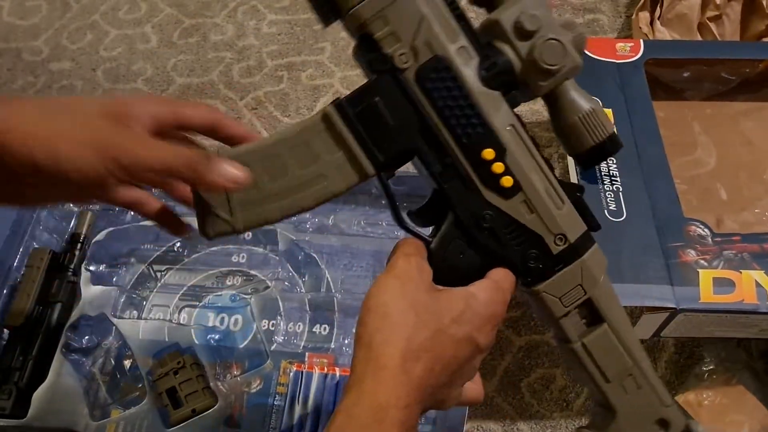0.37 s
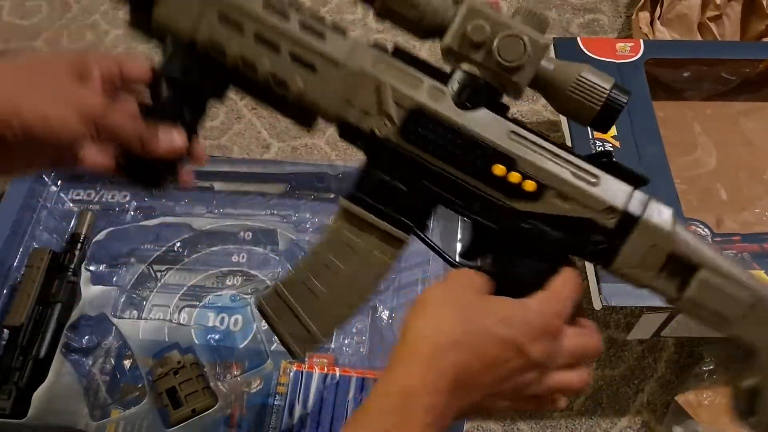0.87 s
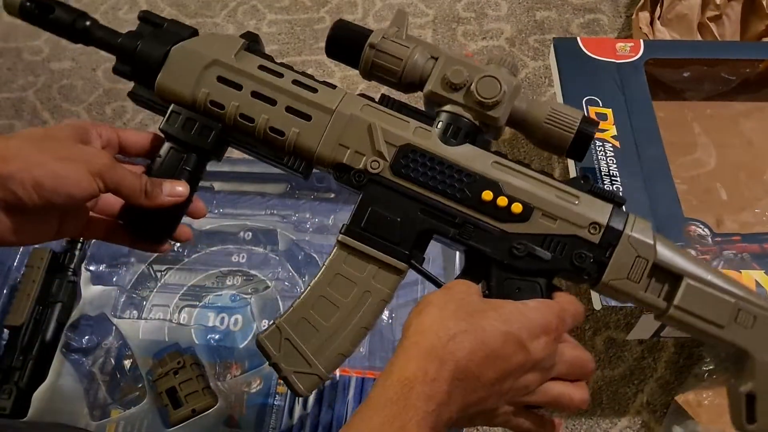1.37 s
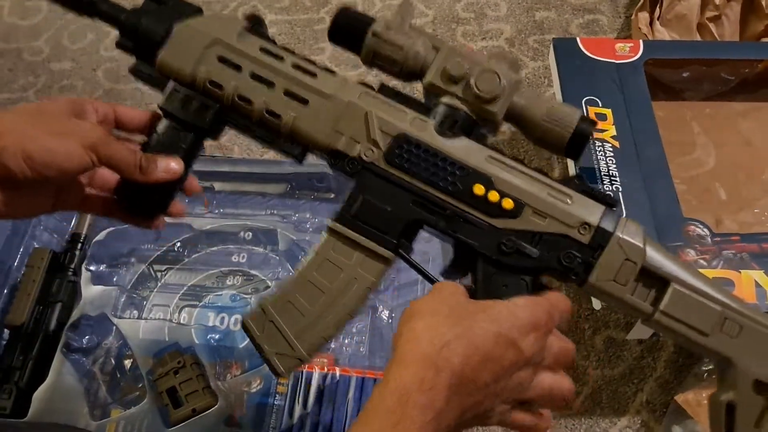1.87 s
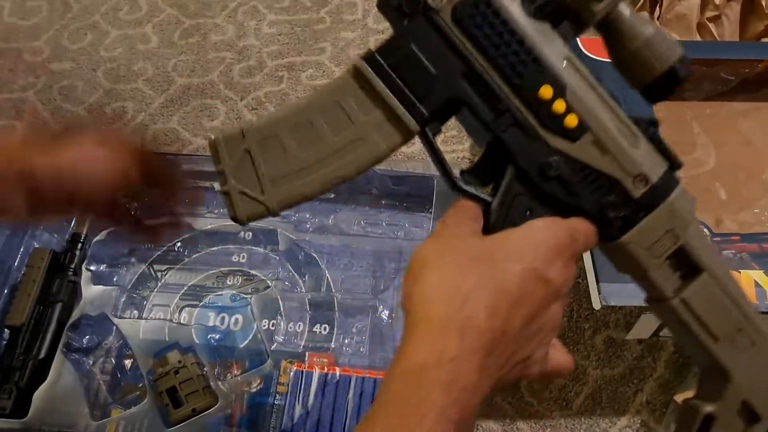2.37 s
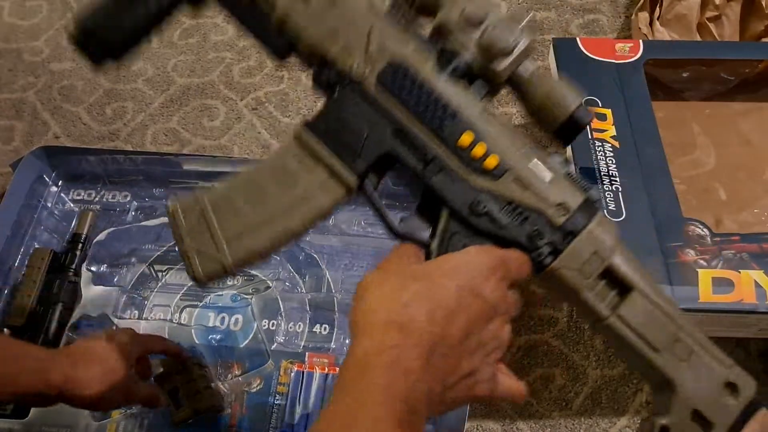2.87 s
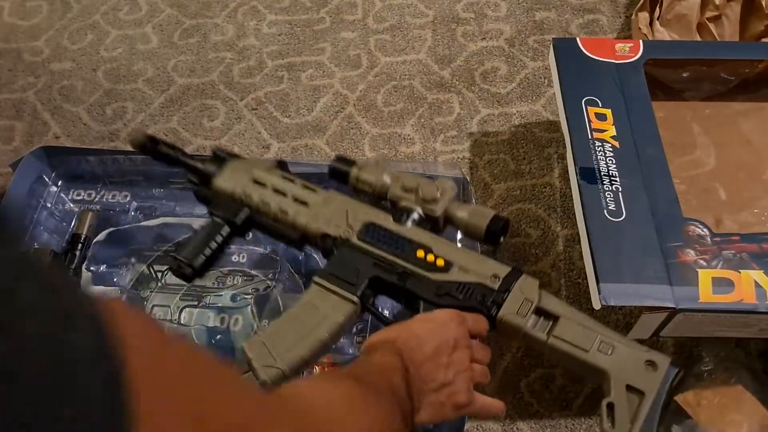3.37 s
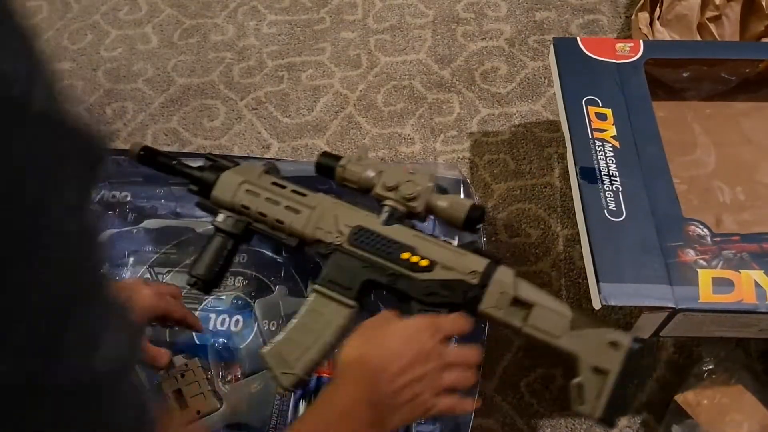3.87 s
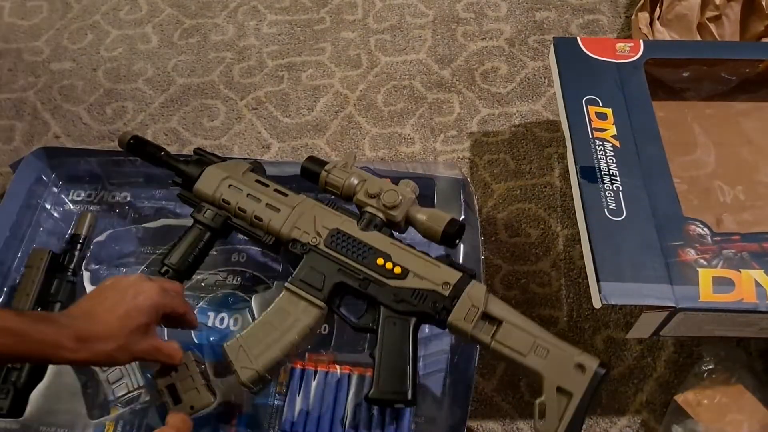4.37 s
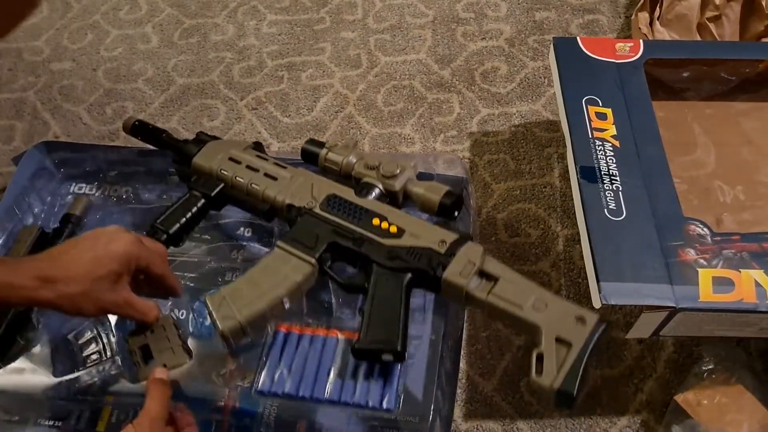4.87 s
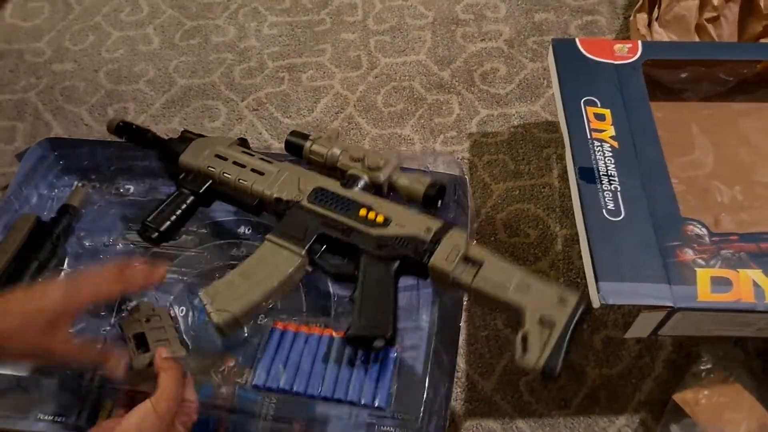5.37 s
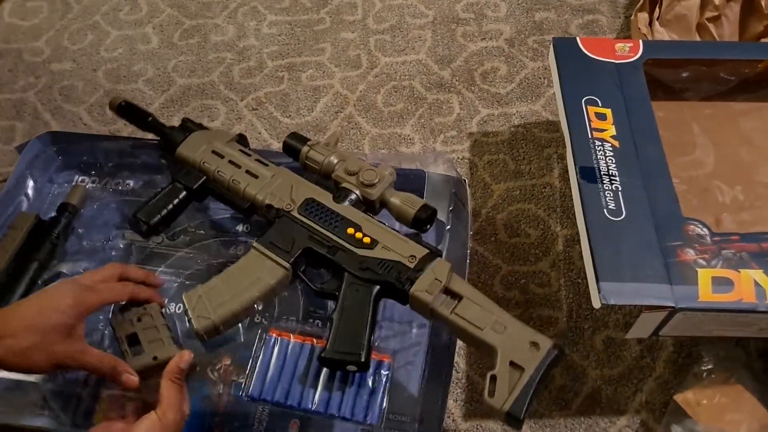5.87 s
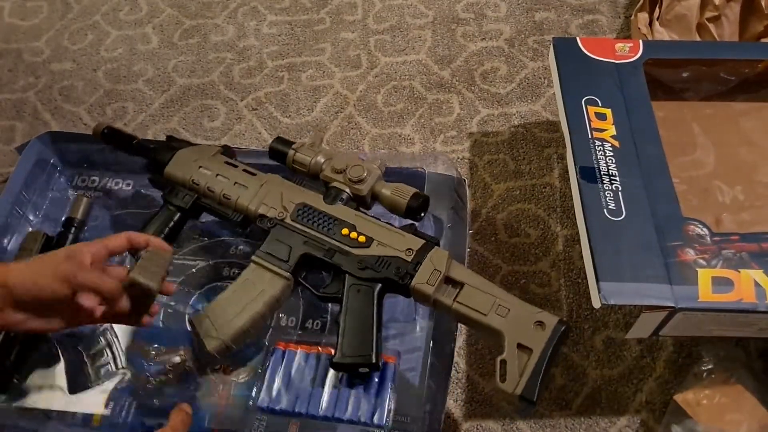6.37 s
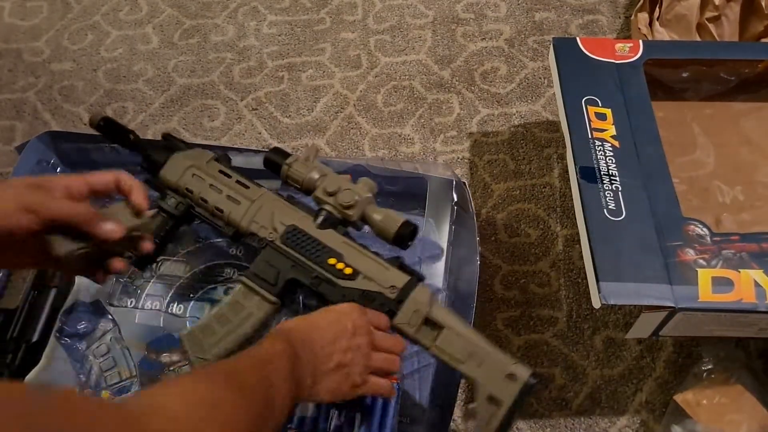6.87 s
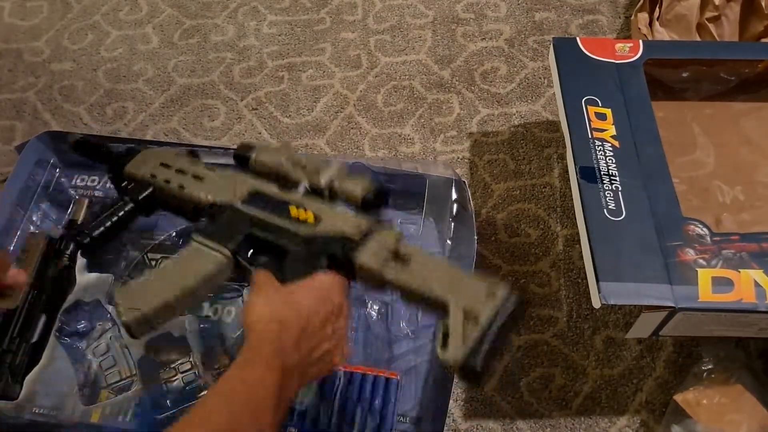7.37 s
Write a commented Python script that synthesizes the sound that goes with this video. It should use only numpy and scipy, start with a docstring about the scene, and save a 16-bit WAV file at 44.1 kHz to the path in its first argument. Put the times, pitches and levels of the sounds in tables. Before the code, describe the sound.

After a quiet start with faint skin rubs, plastic knocks hard on a thin tray, followed by increasingly busy clicking, snapping and crinkly rummaging.

```python
"""In a live room, at two microphones with the hands nearer the left, a hard plastic toy is turned in the hands,
laid on a thin moulded plastic tray, and the hands rummage in the tray. Damped modes make the tray's booms,
the loose part's ticks and the hollow toy's faint ring; noise bursts make the snaps of the walls, and clumped
clicks the crinkle and the slide of skin. Decaying noise answers these sounds as the room;
beneath lie the tail of an earlier clack, a faint room floor and a low hum from the right."""
import sys
import numpy as np
from scipy import signal
from scipy.fft import rfft, irfft
from scipy.io import wavfile
from scipy.ndimage import map_coordinates

SR = 44100
rng = np.random.default_rng(int(sys.argv[2]) if len(sys.argv) > 2 else 0)


def boost(x):
    """Linear amplitude factor 10**(x/20) for a level x in decibels (scalar or array-like)."""
    u = np.asarray(x, float) / 20
    return 10 ** u


def persist_wave(psi):
    """Save psi, clipped to +-1, as 16-bit WAV."""
    counts = np.round(np.clip(psi, -1, 1) * 32767).astype(np.int16)
    wavfile.write(sys.argv[1], SR, np.atleast_2d(counts).T)


N = 329868


def rms_one(x):
    """Scale to rms 1."""
    return x / np.sqrt(np.mean(x ** 2) + 1e-20)


def at_hz(points, hz):
    """Read a table on a log-frequency axis."""
    table_hz, value = np.transpose(points)
    return np.interp(np.log(hz), np.log(table_hz), value)


def drift(rate):
    """Slow chance of spread 1, moving through rate random knots a second."""
    knots = rng.standard_normal(400)
    return map_coordinates(knots, [np.arange(N) / SR * rate], order=3, mode="wrap")


def colour(x, spectrum):
    """Shape a sound to a spectrum in dB per Hz."""
    hz = np.maximum(np.fft.rfftfreq(x.shape[-1], 1 / SR), 1)
    return irfft(rfft(x) * boost(at_hz(spectrum, hz)), x.shape[-1])


def add(track, s, sound):
    """Lay a sound into a track at a time in seconds."""
    at = round(s * SR)
    track[..., at:at + sound.shape[-1]] += sound[..., :N - at]


def grains(per_s, tail_db, clump_db):
    """Clumped clicks of random size and sign."""
    sizes = boost(tail_db * np.minimum(rng.exponential(1, N), 4)) * rng.choice([-1, 1], N)
    happens = rng.random(N) < per_s * boost(clump_db * drift(25)) / SR
    return sizes * happens + 1e-18


def swell(s, held_s, db, rise_db_per_s, fall_db_per_s):
    """Gain of gestures that rise, hold and fall at steady dB rates, summed."""
    t = np.arange(0, N + 64, 64) / SR
    early = np.maximum(s[:, None] - t, 0)
    late = np.maximum(t - (s + held_s)[:, None], 0)
    below = rise_db_per_s * early + fall_db_per_s * late
    return np.interp(np.arange(N) / SR, t, boost(db[:, None] - below).sum(axis=0))


def struck(hits, modes):
    """Each hit strikes every mode of a body with a strength of its own."""
    out, t = np.zeros(N), np.arange(SR // 2) / SR
    hz, level_db, t60 = np.transpose(modes)[:, :, None]
    for (s, db), strength in zip(hits, rng.standard_normal((len(hits), len(modes), 1))):
        decay = boost(level_db + 2.5 * strength - 60 * t / t60)
        rise = 1 - np.exp(-t * hz / 2)
        ring = (decay * rise * np.sin(2 * np.pi * hz * t)).sum(axis=0)
        add(out, s, boost(db) * ring / np.abs(ring).max())
    return out


# Modes of the tray, rung by knocks and rummaging. Each row: frequency in Hz, level in dB.
TRAY_MODES = [(105, 0.5), (175, -6.5), (228, 1), (325, 1.5), (395, 3.5), (560, -1.5), (668, -1),
              (790, -0.5), (950, -1.5), (1180, -3.5), (1340, -5.5), (1600, -5), (1950, -6), (2300, -6)]
# Knocks on the tray. Each row: start in seconds, peak before the bass cut in dB, centre of the ring in Hz.
KNOCKS = [(0.647, -47, 1120), (2.765, -28.5, 300), (2.879, -24.5, 320), (2.9335, -4.5, 258),
          (2.9365, -5, 860), (3.301, -27, 970), (3.417, -36, 408), (3.477, -15.5, 322), (3.592, -22, 575),
          (3.629, -26, 192), (3.775, -20.5, 506), (3.808, -24.5, 320), (4.189, -17.5, 282),
          (4.211, -24.5, 103), (4.431, -28, 520), (4.724, -17.5, 374), (4.937, -9, 830), (4.99, -14, 600),
          (5.1039, -6.5, 442), (5.183, -5, 330), (5.212, -22, 317), (5.321, -22, 554), (5.418, -15, 436),
          (5.462, -18.5, 950), (5.526, -23.5, 430), (5.732, -8, 930), (5.897, -19, 520), (5.94, -14, 647),
          (5.978, -12, 1110), (5.99, -14.5, 406), (6.0628, -2.5, 910), (6.165, -18, 335), (6.278, -19, 225),
          (6.348, -13.5, 496), (6.413, -9.5, 497), (6.732, -22.5, 440), (7.006, -24, 900),
          (7.041, -23, 387), (7.074, -14, 1065), (7.098, -5.5, 1140), (7.179, -12, 1190), (7.1953, -6, 490),
          (7.2743, -13.5, 306)]


def knocks(spread_oct=1.0, detune=0.052, scatter_db=2.0, after_t60=0.069, after_db=-14, rise_cycles=0.65):
    """A brief contact rings modes near its centre: detuned by flexing, damped fast, with a faint after-ring."""
    out, t = np.zeros(N), np.arange(8000) / SR
    hz, level_db = np.transpose(TRAY_MODES)
    chance = rng.standard_normal((len(KNOCKS), 3, len(TRAY_MODES)))
    life = 0.04 * (300 / hz[:, None]) ** .35   # t60 in s, high modes die first
    for (s, db, centre_hz), (tune, strength, delay) in zip(KNOCKS, chance):
        near_db = -6 * (np.log2(hz / centre_hz) / spread_oct) ** 2
        gain = boost(level_db + np.maximum(near_db, -24) + scatter_db * strength)
        late = .0012 * np.abs(delay)[:, None] * (300 / hz[:, None])   # s; lows tend to start later
        since = np.maximum(t - late, 0)
        decay = boost(-60 * since / life) + boost(after_db - 60 * since / after_t60)
        rise = 1 - np.exp(-since * centre_hz / rise_cycles)
        mode_hz = (hz * (1 + detune * tune))[:, None]
        ring = gain @ (decay * rise * np.sin(2 * np.pi * mode_hz * since))
        add(out, s, boost(db) * ring / np.abs(ring).max())
    return out


# Level of snaps and crinkle on the way to the room, in dB against the microphones.
TO_ROOM_DB = 1
# Snaps of the thin walls and ticks of hard plastic. Each row: start in seconds, peak of the ring in dB,
# bright edge against the ring in dB.
SNAPS = [(2.16, -44.5, -44), (2.765, -26.5, -29), (2.8852, -21.5, -45), (2.9357, -1, -22),
         (3.4772, -23, -40), (3.6337, -19.5, -33), (3.78, -22, -54), (3.794, -34.5, -17),
         (3.8108, -15.5, -54), (3.83, -39, 11.5), (3.936, -31, -20), (4.191, -27.5, -31), (4.3002, -19, -9),
         (4.3425, -19.5, -8.5), (4.553, -33.5, -16), (4.7083, -27, -1), (4.809, -25, -54),
         (4.9386, -9, -15.5), (4.9478, -11.5, -9), (4.9915, -10, -9.5), (5.009, -21.5, -21),
         (5.1052, -10, -73), (5.186, -5, -39), (5.345, -17, -42), (5.5552, -21, -24), (5.607, -7.5, -11.5),
         (5.619, -24, -15), (5.7323, -2, -22), (5.9781, -3.5, -6), (5.99, -28.5, -23), (6.109, -35.5, 1.5),
         (6.2044, -17.5, -9), (6.267, -24.5, -2), (6.349, -17, -6.5), (6.4204, -21.5, 3.5),
         (6.4332, -6.5, -8), (6.447, -13, -3), (6.469, -14.5, -10), (6.787, -24.5, -38),
         (6.855, -31.5, -0.5), (7.011, -16.5, -43), (7.073, -10.5, -20.5), (7.1, -4, -61),
         (7.1065, -9.5, -7.5), (7.199, -21.5, -5), (7.2186, -11, -73), (7.3927, -16.5, -48)]


def snaps(q=1.0, unlike=1.0, dull_above=3.5, burst_t60=0.01, slip_s=.0025, slip_db=-7):
    """A buckling wall: a brief noise burst rung by a wide resonance, with a bright edge and a weaker second slip.

    Rows 0 and 1 reach the microphones, a little unlike; row 2, from a single click, is the smooth
    average over all directions that fills the room."""
    out, t = np.zeros((3, N)), np.arange(1200) / SR
    edge = signal.butter(2, [6000, 13500], "band", fs=SR, output="sos")
    send = boost(np.array([[0], [0], [TO_ROOM_DB]]))
    noises = rng.standard_normal((len(SNAPS), 3, 1200))
    for (s, db, top_db), (shared, left, right) in zip(SNAPS, noises):
        later = t - slip_s * (.5 + abs(shared[-1]))   # the wall gives way twice
        second_slip = (later > 0) * boost(slip_db - 60 * abs(later) / burst_t60)
        dying = boost(-60 * t / burst_t60) + second_slip
        click = t == 0
        burst = np.array([(shared + unlike * left) * dying, (shared + unlike * right) * dying, click])
        ring_hz = 4800 * 2 ** (top_db / 25)   # harder contacts ring higher
        resonance = signal.iirpeak(np.clip(ring_hz, 800, 9000), q, fs=SR)
        dull = signal.butter(1, np.clip(dull_above * ring_hz, 3000, 12000), fs=SR, output="sos")
        ring = signal.sosfilt(dull, signal.lfilter(*resonance, burst))
        bright = signal.sosfilt(edge, burst)
        crack = np.array([rms_one(r) + boost(top_db) * rms_one(b) for r, b in zip(ring, bright)])
        add(out, s, boost(db) * send * crack / np.abs(rms_one(ring[0])).max())
    return out


# Facets of the tray's wall. Each row: frequency in Hz, level in dB.
CRINKLE = [(1300, 47.5), (3500, 37), (8000, 44.5), (15000, -6.5)]


def creases(per_s, cycles):
    """Clicks dealt to small facets of the wall, each ringing a few cycles at its own pitch."""
    out, clicks = 0, grains(per_s, tail_db=4.5, clump_db=5.0)
    dealt = rng.integers(0, 10, N)
    for k, hz in enumerate(np.geomspace(1300, 15000, 10)):
        facet = signal.lfilter(*signal.iirpeak(hz, cycles, fs=SR), clicks * (dealt == k))
        out = out + boost(at_hz(CRINKLE, hz)) * rms_one(facet)
    return out


# Pushes of the hands through the tray. Each row: start of full force in seconds, time held in seconds,
# rumble of the tray in dB, crinkle in dB, both before the bass cut.
PUSHES = [(3.518, 0.32, -43.5, -54.5), (3.838, 0.11, -44, -61), (4.219, 0.0059, -34.5, -46),
          (4.45, 0.2, -52.5, -63), (4.733, 0.019, -34, -44), (5.001, 0.0082, -25.5, -27),
          (5.3, 0.45, -42.5, -59), (5.814, 0.0044, -43, -35), (5.959, 0.012, -31, -33.5),
          (6.258, 0.29, -32.5, -49.5), (6.421, 0.0057, -20, -26.5), (6.889, 0.11, -41, -49.5),
          (7.203, 0.0073, -44, -34.5), (7.36, 0.088, -50, -57)]


def rummage(rumble_t60=0.014):
    """Small slips ring the tray's modes; creases crackle over its walls, mostly unlike at the microphones."""
    s, held_s, rumble_db, crinkle_db = np.transpose(PUSHES)
    rise, rumble_fall, crinkle_fall = 326, 178, 337   # dB per s
    rumble, slips = 0, grains(per_s=800, tail_db=2.5, clump_db=3.0)
    r = boost(-60 / (rumble_t60 * SR))   # decay of a mode per sample
    for hz, level_db in TRAY_MODES:
        w = 2 * np.pi * hz / SR
        kicks = slips * rng.standard_normal(N)
        mode = signal.lfilter([0, np.sin(w)], [1, -2 * r * np.cos(w), r * r], kicks)
        rumble = rumble + boost(level_db) * mode
    shared, left, right = [creases(per_s=700, cycles=1.6) for _ in range(3)]
    crinkle = rms_one(shared + 12.0 * np.array([left, right, left]))
    crinkle = crinkle * boost(np.array([[0], [0], [TO_ROOM_DB]]))
    return (swell(s, held_s, rumble_db, rise, rumble_fall) * rms_one(rumble)
            + swell(s, held_s, crinkle_db, rise, crinkle_fall) * crinkle)


# Modes of the hollow toy. Each row: frequency in Hz, level in dB, t60 in seconds.
TOY_MODES = [(675, -7, 0.34), (1560, 0.46, 0.22), (2023, -5, 0.31)]
# Jolts of the toy lying on the tray. Each row: start in seconds, peak before the bass cut in dB.
JOLTS = [(2.937, -20), (5.98, -26)]


def toy_jolts():
    """The hollow toy, jolted on the tray, rings faintly in its own modes."""
    return struck(JOLTS, TOY_MODES)


# Modes of a small loose part. Each row: frequency in Hz, level in dB, t60 in seconds.
PART_MODES = [(2400, -5, .014), (3500, 0, .02)]
# Ticks of the part. Each row: start in seconds, peak in dB.
TICKS = [(6.1744, -33), (6.2462, -24.5), (6.9272, -28), (6.9471, -25)]


def loose_part_ticks():
    """A small part rings for a moment, shielded from the room (row 2) by the hand."""
    return struck(TICKS, PART_MODES) * boost(np.array([[0], [0], [-16]]))


# Spectrum of skin on plastic. Each row: frequency in Hz, level in dB per Hz.
SKIN = [(400, -10), (1600, -5), (1950, 4.5), (2300, -8.5), (5500, -11.5), (16000, -14.5)]
# Skin sliding over the toy. Each row: start of full speed in seconds, time held in seconds, level in dB.
SLIDES = [(0.649, 0.15, -61.5), (1.951, 0.021, -57.5)]


def slides():
    """Skin catches on plastic in many tiny grains: a soft grainy hiss."""
    skin = grains(per_s=9000, tail_db=2.0, clump_db=4.0)
    speed = swell(*np.transpose(SLIDES), rise_db_per_s=240, fall_db_per_s=202)
    return rms_one(colour(skin, SKIN)) * speed


# Third-octave band edges, in Hz.
BAND_EDGES = 70 * 2 ** np.arange(0, 8.1, 1 / 3)
# Likeness of diffuse sound at the two microphones. Each row: frequency in Hz, likeness from 0 to 1.
LIKENESS = [(290, 0.82), (640, 0.54), (1400, 0.045)]


def diffuse_bands(size):
    """Third-octave bands of stereo noise, each with its likeness between the microphones."""
    for low, high in zip(BAND_EDGES, BAND_EDGES[1:]):
        sos = signal.butter(2, [low, high], "band", fs=SR, output="sos")
        mid, side = signal.sosfilt(sos, rng.standard_normal((2, size)))
        hz = np.sqrt(low * high)
        alike = np.clip(at_hz(LIKENESS, hz), 0, 1)
        yield hz, np.sqrt(1 + alike) * mid + np.sqrt(1 - alike) * side * [[1], [-1]]


# Reverberation time of the room. Each row: frequency in Hz, t60 in seconds.
ROOM_T60 = [(150, 0.28), (1000, 0.83), (6000, 0.59), (14000, 0.37)]
# Colour of the room. Each row: frequency in Hz, level against the direct sound in dB.
ROOM_COLOUR = [(150, -3), (450, -9), (1000, -12), (6000, -9), (14000, -10)]


def room(x, build_s=0.0003):
    """The answer of the walls: noise that builds almost at once and dies band by band."""
    t, answer = np.arange(SR // 2) / SR, 0
    for hz, band in diffuse_bands(len(t)):
        t60 = at_hz(ROOM_T60, hz)
        decay = boost(at_hz(ROOM_COLOUR, hz) - 60 * t / t60)
        answer = answer + band * decay / np.sqrt(t60 * SR / 14)   # long tails carry no extra energy
    answer = answer * (1 - np.exp(-t / build_s))
    return signal.fftconvolve(x[None], answer, axes=1)[:, :N]


# Spectrum of a clack still dying in the room. Each row: frequency in Hz, level in dB per Hz.
EARLIER = [(200, -22), (306, 2), (770, -3.5), (2600, 0.5), (15000, -28)]


def earlier_clack(start_db=-37.5, t60=0.46):
    """Only its reverberation is left: coloured noise dying away from the start."""
    tail = rms_one(colour(rng.standard_normal((2, N)), EARLIER))
    return tail * boost(start_db - 60 * np.arange(N) / SR / t60)


# Spectrum of the room noise. Each row: frequency in Hz, level in dB per Hz.
FLOOR = [(60, 13.5), (170, -4), (320, 6), (420, -11.5), (950, -10), (1300, -16.5), (6000, -25.5),
         (8200, -18), (16500, -41)]
# Lean of the room noise. Each row: frequency in Hz, left against right in dB.
FLOOR_PAN = [(100, -16.5), (300, -4), (2400, 0.5)]


def room_floor(level_db=-64.5):
    """Diffuse room noise, its bass from the right."""
    air = 0
    for hz, band in diffuse_bands(N):
        air = air + band * boost(at_hz(FLOOR_PAN, hz) * np.array([[.5], [-.5]]))
    return boost(level_db) * rms_one(colour(air, FLOOR))


def hum(centre_hz=56.8, level_db=-49, left_db=-16.5):
    """A low sine from the right, slightly wavering in pitch and level."""
    phase = 2 * np.pi * np.cumsum(centre_hz + 0.25 * drift(2.3)) / SR
    tone = np.sqrt(2) * np.sin(phase) * boost(level_db + 0.8 * drift(3))
    return tone * boost(np.array([[left_db], [0]]))


def scene():
    """All sources at two microphones, with the room."""
    bass_cut = signal.butter(2, 134, "high", fs=SR, output="sos")   # a small tray radiates little deep bass
    tray_and_toy = signal.sosfilt(bass_cut, knocks() + rummage() + toy_jolts())
    left, right, all_round = tray_and_toy + snaps() + loose_part_ticks() + slides()
    t = np.arange(N)
    late_right = np.interp(t - 8, t, right)   # 8 samples: the hands work nearer the left microphone
    return np.array([left, late_right]) + room(all_round) + earlier_clack() + room_floor() + hum()


def top_cut(x):
    """Nothing passes above the cut-off."""
    return signal.sosfilt(signal.butter(12, 16980, fs=SR, output="sos"), x)


def record(dry):
    """The highest peaks are rounded softly."""
    mix = np.tanh(dry)
    return top_cut(mix)


dry = scene()
out = record(dry)
persist_wave(out)
```